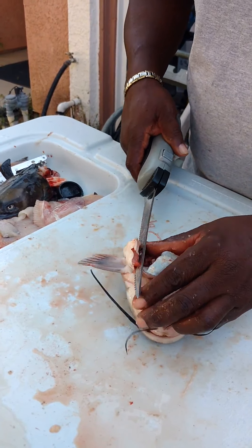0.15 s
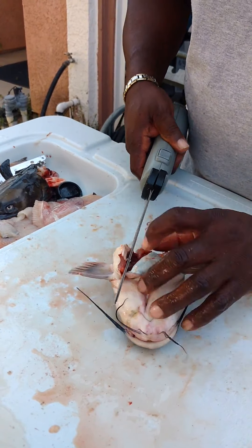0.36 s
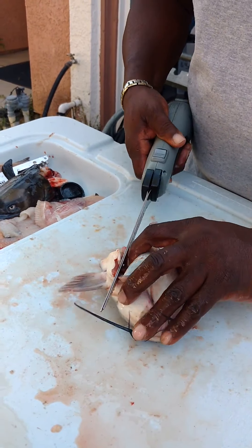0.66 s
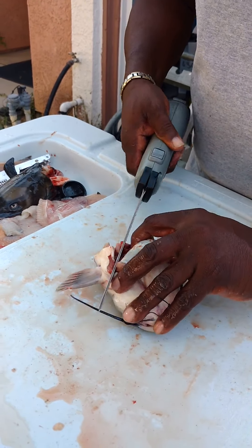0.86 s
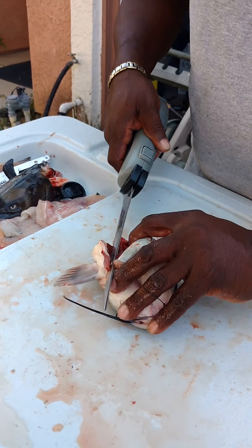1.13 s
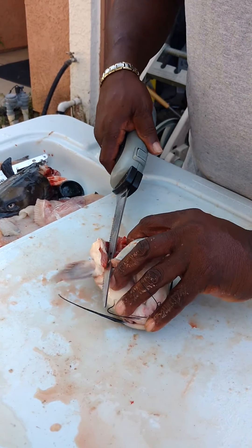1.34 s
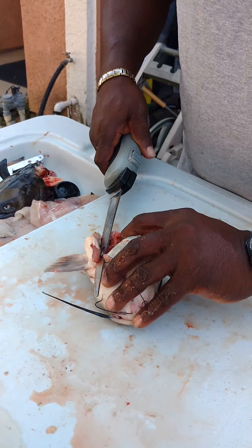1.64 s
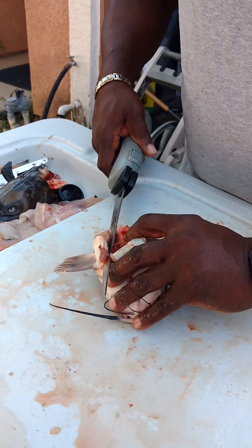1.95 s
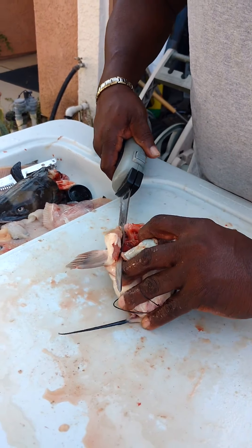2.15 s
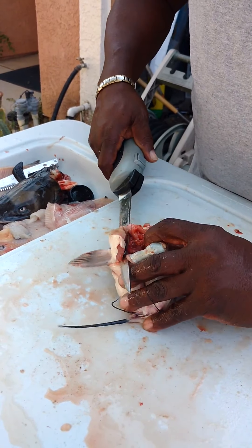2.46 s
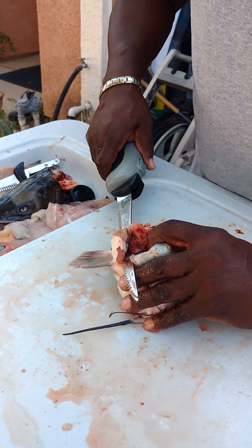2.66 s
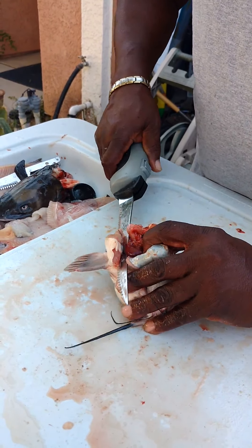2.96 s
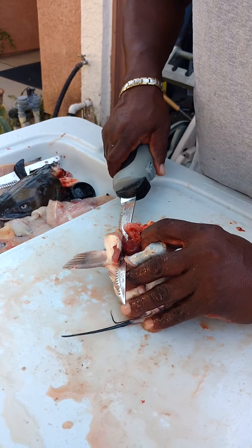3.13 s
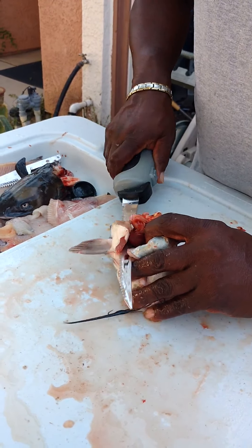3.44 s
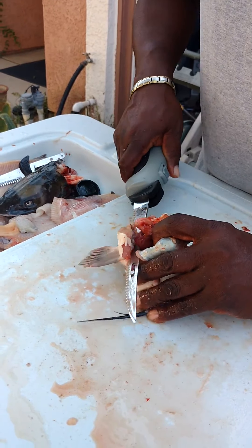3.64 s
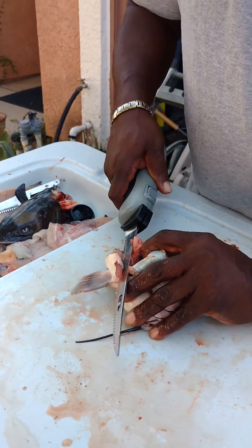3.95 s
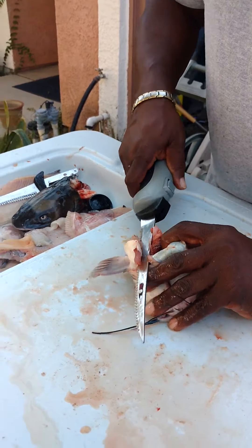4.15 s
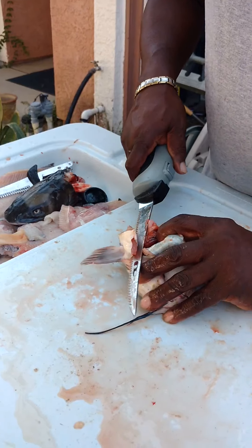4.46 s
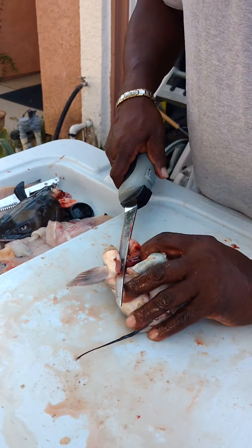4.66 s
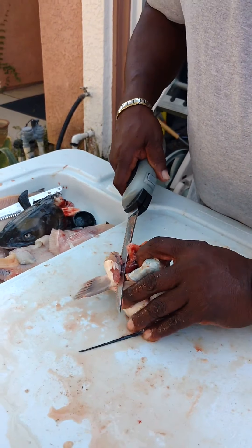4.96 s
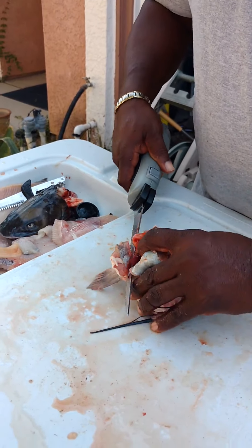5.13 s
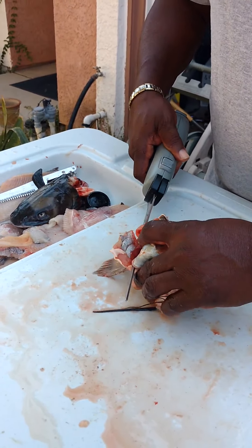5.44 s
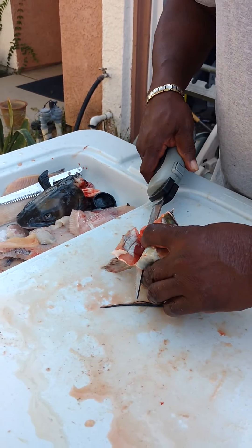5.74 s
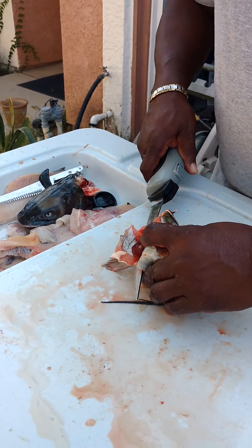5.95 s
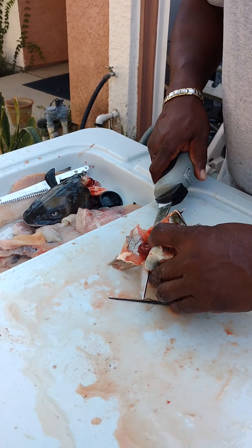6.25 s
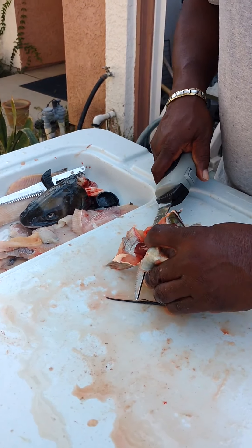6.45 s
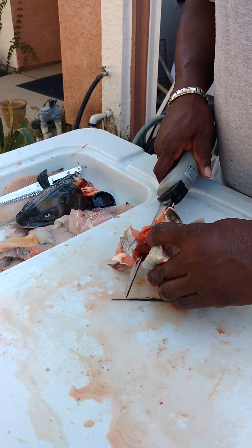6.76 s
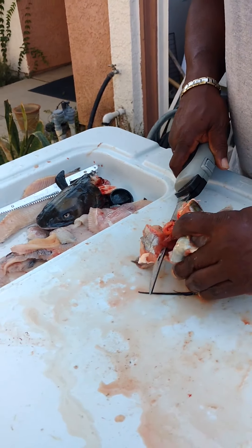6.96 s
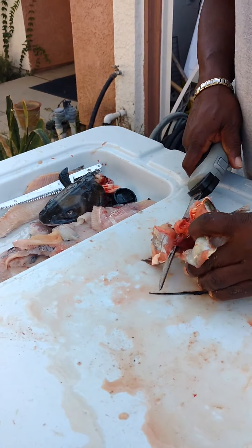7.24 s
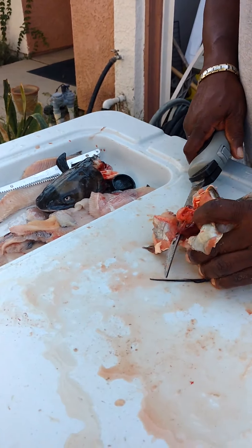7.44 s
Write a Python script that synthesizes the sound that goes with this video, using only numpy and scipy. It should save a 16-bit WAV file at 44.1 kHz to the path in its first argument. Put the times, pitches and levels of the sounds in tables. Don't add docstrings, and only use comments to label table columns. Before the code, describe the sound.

Buzzing, clattering saw bursts start and stop outdoors, blades knocking on bone and drumming a plastic tabletop while insects trill in the gaps.

```python
import sys
import numpy as np
from scipy import signal
from scipy.fft import rfft, irfft, next_fast_len
from scipy.io import wavfile
from scipy.ndimage import uniform_filter1d

SR = 44100
rng = np.random.default_rng(int(sys.argv[2]) if len(sys.argv) > 2 else 0)


def unload_wav(signal):
    wavfile.write(
        sys.argv[1],
        SR,
        np.round(np.clip(np.atleast_2d(signal).T, -1, 1) * 32767).astype(np.int16),
    )


def linear_from_db(decibels):
    return 10 ** (np.asarray(decibels, float) / 20)


N = 335160
FULL_PER_S = 60


def at_hz(points, hz):
    table = np.array(points)
    return np.interp(np.log(hz + 1), np.log(table[:, 0]), table[:, 1])


def rms_one(x):
    return x / np.sqrt(np.mean(x ** 2) + 1e-20)


def columns(rows, s):
    times, *values = np.transpose(rows)
    return [np.interp(s, times, v) for v in values]


def colour(x, spectrum):
    log_gain = np.log(linear_from_db(at_hz(spectrum, np.linspace(0, SR / 2, 1025))))
    cepstrum = irfft(log_gain)
    cepstrum[1:1024] *= 2
    cepstrum[1025:] = 0
    response = irfft(np.exp(rfft(cepstrum)))
    return signal.oaconvolve(x, response[None], axes=1)[:, :N]


def resonate(x, hz, width_hz):
    r = np.exp(-np.pi * width_hz / SR)
    feedback = [1, -2 * r * np.cos(2 * np.pi * hz / SR), r * r]
    return signal.lfilter([(1 - r * r) / 2, 0, (r * r - 1) / 2], feedback, x)


def settle(x, seconds):
    r = np.exp(-1 / (abs(seconds) * SR))
    return signal.lfilter([1 - r], [1, -r], x)


def drift(rate):
    low = signal.butter(2, rate, fs=SR, output="sos")
    return rms_one(signal.sosfilt(low, rng.standard_normal(N + SR))[SR:])


def luck(s):
    return rng.standard_normal(len(s))


def noise():
    return rng.standard_normal((2, N))


def grit(spread_db):
    uneven = np.minimum(rng.exponential(1, N), 5)
    return rms_one(noise() * linear_from_db(spread_db * uneven))


def clicks(s, sizes):
    out = np.full(N, 1e-18)
    np.add.at(out, np.clip((s * SR).astype(int), 0, N - 1), sizes)
    return out


def burst(s, sizes, rise_ms, fall_ms):
    ms = np.arange(2000) / SR * 1000
    shape = (1 - np.exp(-ms / rise_ms)) ** 2 * np.exp(-ms / fall_ms)
    shape = shape / np.sqrt(np.sum(shape ** 2) / SR)
    return signal.fftconvolve(clicks(s, sizes), shape)[:N]


def struck(s, sizes, hz, t60, soft_ms):
    t = np.arange(3000) / SR
    shape = (1 - np.exp(-t * 1000 / soft_ms)) * linear_from_db(-60 * t / t60)
    rings = sizes[:, None] * shape * np.sin(2 * np.pi * hz[:, None] * t)
    rings = rings / np.sqrt(np.sum(shape ** 2) / SR / 2)
    out = np.zeros(N + 6000)
    np.add.at(out, (s * SR).astype(int)[:, None] + np.arange(3000), rings)
    return out[:N]


# f/Hz, level/dB
INSECT_TONE = [(2300, -12.5), (2800, -4), (3300, -1), (3870, 5), (4100, -0.5), (4500, -9.5), (6300, -10.5),
               (8700, -13.5), (11000, -20), (15000, -43)]


def insects(pace):
    quiet_knife_db, running_knife_db = -29, -42.5
    ducked = np.maximum(settle(pace, 0.27), settle(pace, 0.5))
    level_db = quiet_knife_db + (running_knife_db - quiet_knife_db) * ducked
    rasp = linear_from_db(2.0 * drift(220))
    return linear_from_db(level_db) * rms_one(colour(rasp * noise(), INSECT_TONE))


# f/Hz, level/dB
YARD_TONE = [(30, -7), (60, -20), (150, 6.5), (300, 4.5), (500, -13), (800, 7), (2200, 7.5), (5000, -5.5),
             (12000, -40)]


def yard(pace):
    idle_db, running_db = -44, -35.5
    level_db = idle_db + (running_db - idle_db) * pace
    return linear_from_db(level_db) * rms_one(colour(noise(), YARD_TONE))


def rumble(table_db):
    band = signal.butter(2, [110, 330], "band", fs=SR, output="sos")
    level_db = table_db - 14.0 + 3.6 * drift(16.4)
    return linear_from_db(level_db) * rms_one(signal.sosfilt(band, noise()))


# t/s, pressure level/dB,
# table shake level/dB at twice the crank rate, the same at three times
LEAN = [(0.0, -43, -71, -70), (0.4, -53, -72, -68), (0.5, -38.5, -72, -67), (0.97, -45, -66, -56),
        (1.08, -40, -56, -53), (1.57, -41.5, -64, -42), (1.67, -38, -61, -53), (1.9, -49, -61, -70),
        (2.5, -43, -57, -54), (3.0, -44, -67, -68), (3.45, -42.5, -70, -62), (3.9, -43, -62, -44),
        (4.3, -41.5, -73, -65), (4.7, -39, -46, -60), (5.15, -46, -63, -63), (5.82, -42, -62, -66),
        (6.5, -42.5, -72, -50), (7.6, -42.5, -70, -61.5)]


def hand_pressure():
    lean_db, second_db, third_db = columns(LEAN, np.arange(N) / SR)
    table_db = -40 + 1.87 * (lean_db + 44.5)
    return table_db, second_db, third_db


def thud(third_db):
    band = signal.butter(2, [45, 110], "band", fs=SR, output="sos")
    level_db = third_db - 2.5 + 2.7 * drift(6)
    return linear_from_db(level_db) * rms_one(signal.sosfilt(band, noise()))


def hum(speed, second_db, third_db):
    turns = np.cumsum(speed) / SR / 2
    running = uniform_filter1d(np.clip(speed / 50, 0, 1) ** 4, size=2000)
    second = linear_from_db(second_db + 7.5) * np.sin(2 * np.pi * 2 * turns)
    third = linear_from_db(third_db + 5.0) * np.sin(2 * np.pi * 3 * turns)
    return running * (second + third)


# multiple of the crank rate, level/dB over the drumming
HIGH_MULTIPLES = [(4, -19), (5, -15), (6, -18), (7, -15), (8, -17), (9, -15), (10, -16), (11, -19)]


def buzz(speed, table_db):
    turns = np.cumsum(speed) / SR / 2
    steady = np.clip(np.minimum(speed, settle(speed, .2)) / 56, 0, 1) ** 8
    lines = 0
    for multiple, db in HIGH_MULTIPLES:
        swell = linear_from_db(db + 4 * drift(1.5))
        lines = lines + swell * np.sin(2 * np.pi * (multiple * turns + rng.random()))
    return steady * linear_from_db(table_db + 1.5) * lines


# f/Hz, level/dB
WHIRR_TONE = [(400, -5.5), (800, -1), (1350, 7), (2200, 4), (3100, 9.5), (4500, -1.5), (7000, 0),
              (10400, -11.5), (12000, -11.5), (14500, -23), (15800, -44)]
# t/s, level/dB
DRAG = [(0.6, 3), (1.0, 0.5), (1.5, 4.5), (2.05, -4.5), (2.4, 1.5), (2.8, 1.5), (3.35, -5.5), (3.6, -0.5),
        (4.5, 0), (5.1, -1), (5.76, 3), (6.1, -11), (6.55, 0), (7.2, 0)]


def whirr(pace):
    level_db = np.maximum(-34 + 2.67 * np.log2(pace + 1e-3), -51.5)
    level_db = level_db + columns(DRAG, np.arange(N) / SR)[0]
    return linear_from_db(level_db + 4.2 * drift(66)) * rms_one(colour(grit(spread_db=0.5), WHIRR_TONE))


# t/s, peak level/dB
TICKS = [
    (0.095, -32),
    (0.127, -17),
    (0.451, -17),
    (0.586, -14),
    (7.554, -14),
]


def ticks():
    s, db = np.transpose(TICKS)
    touch = burst(s, 0.02 * linear_from_db(db), rise_ms=0.14, fall_ms=0.5)
    return colour(touch * grit(spread_db=0.5), WHIRR_TONE)


# pressed t/s, free speed (reversals/s), sag under load (reversals/s per s),
# released t/s, speed when pressed (reversals/s)
TRIGGER = [
    (0.6213, 58.92, -14.36, 0.9597, 19.65),
    (1.6227, 62.60, 1.07, 3.3953, 39.49),
    (4.0122, 59.87, -0.47, 5.0889, 34.21),
    (5.6437, 62.99, 7.37, 7.1364, 28.81),
    (7.537, 61.87, 0, 8, 22.32),
]


def crank():
    spin_up_s, coast_per_s2, stall_per_s = .1023, 70.16, 11
    jam_s, jam_per_s2 = 7.1364, 66.73
    t = np.arange(N) / SR
    pull = np.clip(np.searchsorted(np.array(TRIGGER)[:, 0], t) - 1, 0, None)
    press, free, sag, release, start = np.transpose(TRIGGER)[:, pull]
    speed = free + (start - free) * np.exp(-(t - press) / spin_up_s)
    speed -= sag * (t - press)
    speed -= coast_per_s2 * np.maximum(t - release, 0)
    speed -= jam_per_s2 * np.maximum(t - jam_s, 0) * (press < jam_s)
    speed *= (speed > stall_per_s) & (t >= press)
    done = np.cumsum(speed) / SR
    whole = np.floor(done - np.interp(press, t, done)) + 1000 * pull
    s = t[1:][(np.diff(whole) != 0) & (speed[1:] > 0)]
    s = np.sort(np.append(s, TRIGGER[0][0]))
    return speed, s[np.diff(s, append=9) > .012]


# t/s, load on bone level/dB, knock f/Hz (falls with depth),
# backstroke weaker by level/dB, crank slack level/dB
KNIFE = [(0.62, -29.5, 1340, -2, -34), (0.9, -36, 1310, -5, -30), (1.2, -28.5, 1280, 7, -35),
         (1.5, -28, 1240, -5, -32.5), (1.8, -28, 1370, 5.5, -30.5), (2.2, -33.5, 1340, 5, -34),
         (2.9, -30, 1330, 10.5, -31), (3.35, -33.5, 1330, 2, -33), (3.7, -27.5, 1160, -2.5, -31.5),
         (4.2, -31, 1220, 1, -34), (4.6, -27, 1227, 1.5, -33), (5.05, -32.5, 1290, 5.5, -29.5),
         (5.4, -33.5, 1050, -7.5, -40.5), (5.9, -27.5, 1250, -1.5, -29.5), (6.2, -24.5, 1154, 10, -32),
         (6.6, -22.5, 1173, -1, -31), (6.95, -16, 1142, 11, -31), (7.6, -15.5, 1130, 0.5, -28)]
# t/s, clack and ring level/dB, knock level/dB
ODD_STROKES = [(0.622, 8.5, -8), (0.657, -4, 1), (0.69, 4, 3), (0.713, 4, 2.5), (0.735, 5.5, 0.5),
               (2.21, -9, 2.5), (2.29, 7, 1), (2.957, 2, 4), (2.99, 2, 4), (3.135, 5, 2), (3.2, 6, 0),
               (3.3, 7, 2), (3.335, 5, 1), (3.47, 6, 0), (3.503, 6, 2), (3.54, 6, 0), (4.11, 6, 1.5),
               (1.5, 0, 6.5), (3.92, 2.5, 2.5), (5.57, -4, 3.5), (5.6, 2.5, 3), (5.68, 2, 1),
               (7.27, 4.5, 1), (7.3, -1, -0.5), (7.345, -1.5, -4), (7.4, -3.5, -1), (7.54, 2.5, -7),
               (7.57, -2, -1.5)]


def strokes(speed, s):
    load_db, knock_hz, back_db, slack_db = columns(KNIFE, s)
    halvings = np.log2(FULL_PER_S / np.interp(s + .002, np.arange(N) / SR, speed + 1))
    odd = np.zeros((2, len(s)))
    for when, *extra_db in ODD_STROKES:
        odd[:, np.argmin(abs(s - when))] = extra_db
    clack_db = slack_db - 5.7 * halvings + odd[0]
    ring_db = -30 + 0.58 * (slack_db + 31.5) - 3.6 * halvings + odd[0]
    knock_db = load_db - 5.9 * halvings + odd[1]
    lag_ms = 3.388 + 2.0 * halvings
    return clack_db, ring_db, knock_db, knock_hz, back_db, lag_ms


# f/Hz, level/dB
CLICK_TONE = [(500, -49.5), (1300, 1), (2200, 6), (3600, -15.5), (4900, 4.5), (5700, -2), (7000, 2.5),
              (8100, 2), (9300, 0.5), (10400, 2.5), (11800, -10), (14500, -15), (15800, -4)]


def click_noise(envelope, spread_db):
    return colour(envelope * grit(spread_db), CLICK_TONE)


def slack_clack(s, rebound, share, clack_db, weaker_db):
    first = share * linear_from_db(clack_db - .4 * weaker_db + 2.2 * luck(s))
    second = share * linear_from_db(clack_db - 7.5 + 3.7 * luck(s))
    slap = burst(s, first, rise_ms=.4, fall_ms=1.6)
    slap += burst(rebound, second, rise_ms=0.46, fall_ms=2.6)
    return click_noise(slap, spread_db=4.0) * linear_from_db(2)


# f/Hz, width/Hz, level/dB
HOUSING = [(2656, 290, 5), (3236, 400, 3.5), (3800, 450, -1.5), (4260, 130, -9)]


def housing_ring(s, rebound, share, ring_db):
    shake = burst(s, share * linear_from_db(ring_db + 2.5 * luck(s)), rise_ms=0.24, fall_ms=3.9)
    shake += burst(rebound, share * linear_from_db(ring_db - 11.5 + 0.7 * luck(s)), rise_ms=0.6, fall_ms=2.2)
    shake = shake * grit(spread_db=2.0)
    ring = 0
    for k, (hz, width_hz, db) in enumerate(HOUSING):
        ring = ring + (-1) ** k * linear_from_db(db) * resonate(shake, hz, width_hz)
    return linear_from_db(9) * ring


# f/Hz, 60 dB decay t/s, level/dB
TABLE = [(155, 0.048, -5), (196, 0.055, -4.5), (258, 0.046, 2.5), (313, 0.11, -14)]


def table_drum(s, share, back, uneven_db, table_db):
    push = clicks(s + 0.00303, share * linear_from_db(-7.0 * back + uneven_db * luck(s)))
    drum = 0
    for hz, t60, db in TABLE:
        drum = drum + linear_from_db(db + table_db) * resonate(push, hz, 2.12 / t60) / np.sqrt(2.05 / t60)
    return linear_from_db(72) * drum


# f/Hz, 60 dB decay t/s, level/dB
HEAD = [(680, .02, -9), (768, .045, -1), (850, .02, -8), (1850, .012, -8)]


def bone_knock(s, blow, force, knock_hz, uneven_db):
    detune = .012
    main_hz = knock_hz * (1.03 + 2 * detune * luck(s))
    knock = struck(blow, force * linear_from_db(-3), main_hz, t60=.014, soft_ms=.35)
    low_hz = knock_hz * (.95 + 0.0497 * luck(s))
    knock += struck(blow, force * linear_from_db(-14.5 + 4.6 * luck(s)), low_hz, t60=0.041, soft_ms=1.0)
    tap_hz = knock_hz * (1.127 + 0.065 * luck(s))
    knock += struck(s, force * linear_from_db(-8.5 + 1.9 * luck(s)), tap_hz, t60=0.0074, soft_ms=0.11)
    contact = blow + 0.00042 * luck(s)
    for hz, t60, db in HEAD:
        size = force * linear_from_db(db - 6.5 + 2 * uneven_db * luck(s))
        knock += struck(contact, size, hz * (1 + detune * luck(s)), t60, soft_ms=1.0)
    return signal.sosfilt(signal.cheby1(5, 1, 620, "high", fs=SR, output="sos"), knock)


def knife(speed, reversals, table_db):
    uneven_db = 1.2
    s = reversals - .0016 + 0.00028 * luck(reversals)
    share = np.sqrt(np.clip(np.gradient(s), .014, .045))
    clack_db, ring_db, knock_db, knock_hz, back_db, lag_ms = strokes(speed, reversals)
    back = (np.arange(len(s)) + 1) % 2
    rebound = s + 0.0025 + 0.0027 * luck(s)
    blow = s + np.clip(lag_ms - 1.2, 0, 9) / 1000 + 0.00021 * luck(s)
    force = share * linear_from_db(knock_db - back * back_db + uneven_db * luck(s))
    crack = burst(blow, force * linear_from_db(-16 + 3 * luck(s)), rise_ms=0.25, fall_ms=.8)
    sound = slack_clack(s, rebound, share, clack_db, back * back_db)
    sound = sound + click_noise(crack, spread_db=2.0)
    sound = sound + housing_ring(s, rebound, share, ring_db)
    sound = sound + bone_knock(s, blow, force, knock_hz, uneven_db)
    return sound + table_drum(s, share, back, uneven_db, table_db)


# f/Hz, level/dB
TILT = [(60, 2), (140, 1), (300, -4), (550, -1), (750, 0), (1600, 0), (2800, 0), (5600, -3), (7000, 0),
        (15000, 0)]
# f/Hz, share (0 to 1)
UNLIKE = [(60, 0.96), (250, 0.3), (600, 1), (1900, 1), (3100, 0.17), (4300, 0.13), (12000, 1)]
# f/Hz, level/dB
DIFFERENCE = [(100, -3), (800, 14), (1300, -3.5), (2000, -5), (2400, -13.5), (2800, -2), (4600, 3.5),
              (7500, -3), (12000, 1)]
# f/Hz, level/dB
LEAK = [(1500, -37), (3700, -12.5), (6300, -9.5), (9000, -6.5), (11500, -28), (14000, -14)]


def ports(direct, scattered):
    port_lag_s, in_phase_hz = 0.0003956, 1198
    size = next_fast_len(N + 4096)
    hz = np.arange(size // 2 + 1) * SR / size
    lag = 2 * np.pi * port_lag_s * np.maximum(hz - in_phase_hz, 0)
    lag = lag - .17 * np.sin(2 * lag)
    lag = lag + 0.15 * (hz < 900) + 2.42 / (1 + (hz / 130) ** 3)
    unlike = np.clip(at_hz(UNLIKE, hz), 0, 1)
    direct, scattered = rfft(direct, size), rfft(scattered, size)
    leak = linear_from_db(at_hz(LEAK, hz)) * scattered
    both = np.cos(lag / 2) * direct + 0.93 * leak
    mixed = np.sqrt(1 - unlike) * direct + np.sqrt(unlike) * scattered
    difference = -1j * np.sin(lag / 2) * mixed
    difference = linear_from_db(at_hz(DIFFERENCE, hz)) * difference + leak
    tilt = linear_from_db(at_hz(TILT, hz) / 2)
    return irfft([(both + difference) * tilt, (both - difference) / tilt], size)[:, :N]


def scene():
    speed, reversals = crank()
    pace = settle(speed / FULL_PER_S, 0.0067)
    table_db, second_db, third_db = hand_pressure()
    background = insects(pace) + yard(pace) + rumble(table_db)
    table = thud(third_db) + hum(speed, second_db, third_db) + buzz(speed, table_db)
    blades = whirr(pace) + ticks() + knife(speed, reversals, table_db)
    return ports(*(background + table + blades))


def band_limit(x):
    return signal.sosfilt(signal.butter(12, 16000, fs=SR, output="sos"), x)


def record(dry):
    top = signal.cheby2(12, 55, 16000, fs=SR, output="sos")
    bottom = signal.butter(2, 48, "high", fs=SR, output="sos")
    filtered = signal.sosfilt(np.vstack([top, bottom]), dry)
    rounded = 1.059 * np.tanh(filtered / 1.137)
    return band_limit(rounded)


dry = scene()
out = record(dry)
unload_wav(out)
```